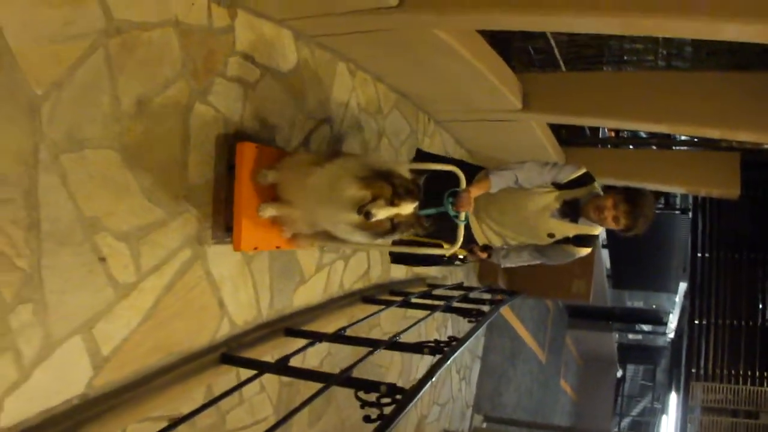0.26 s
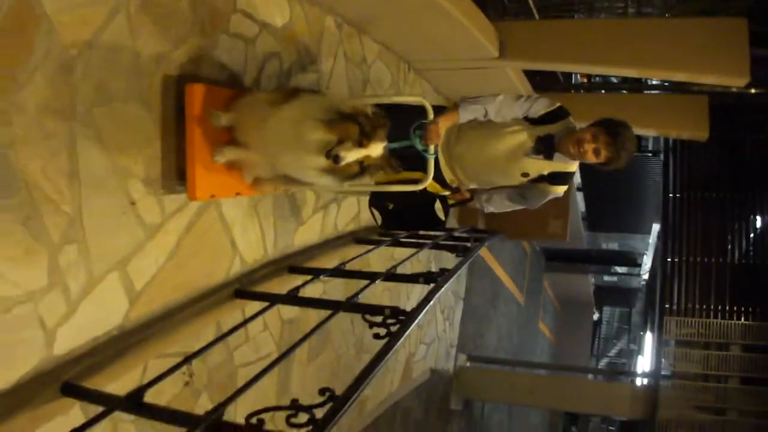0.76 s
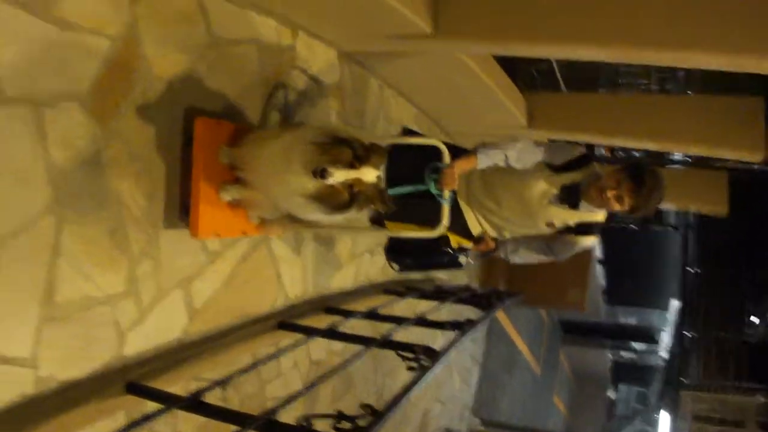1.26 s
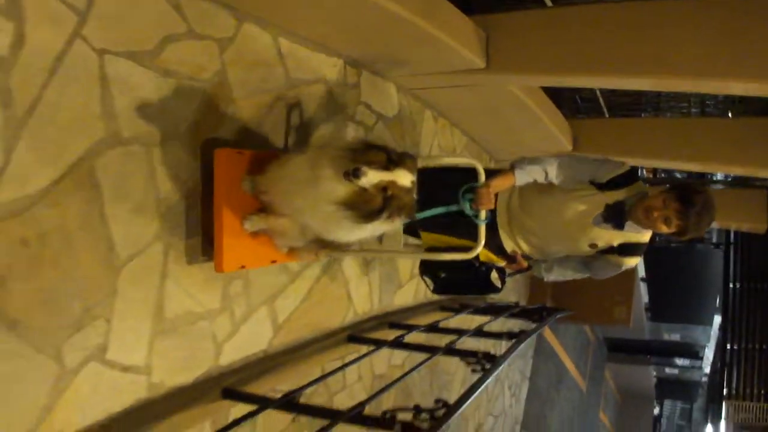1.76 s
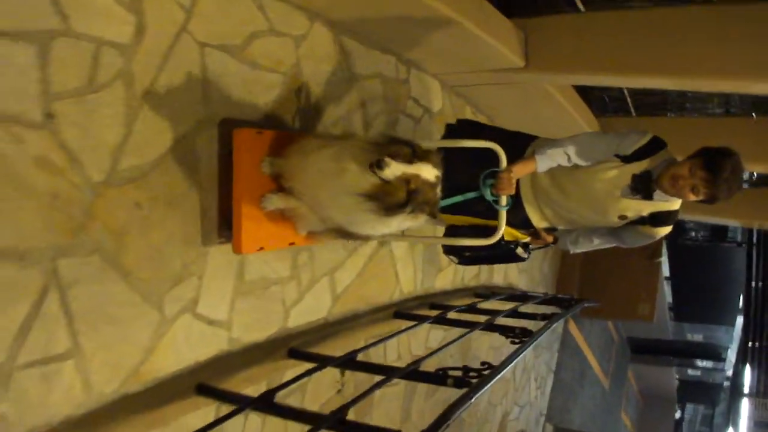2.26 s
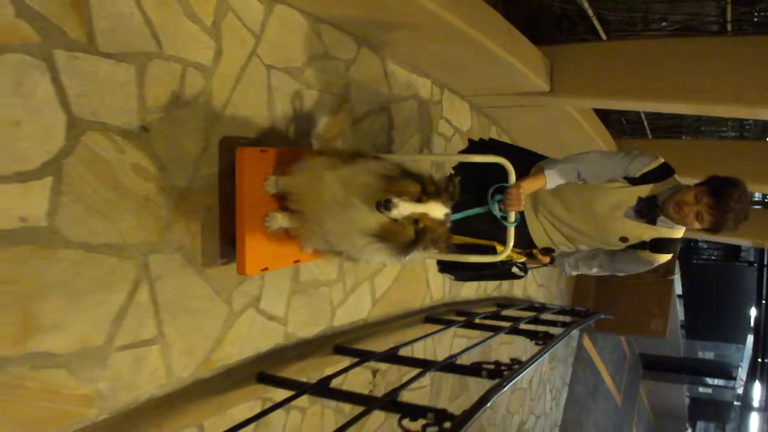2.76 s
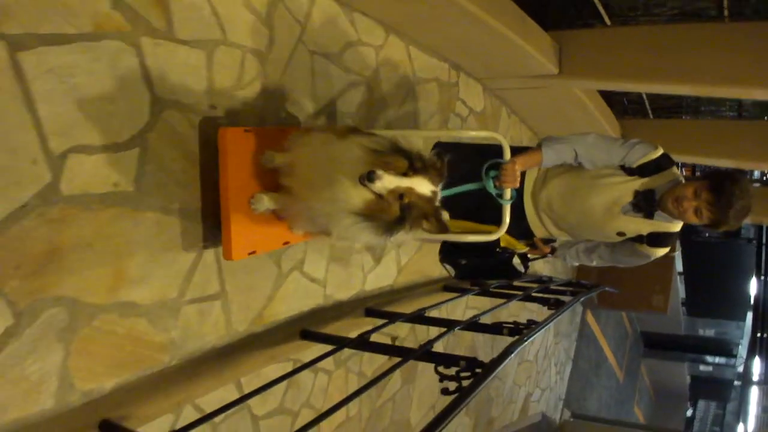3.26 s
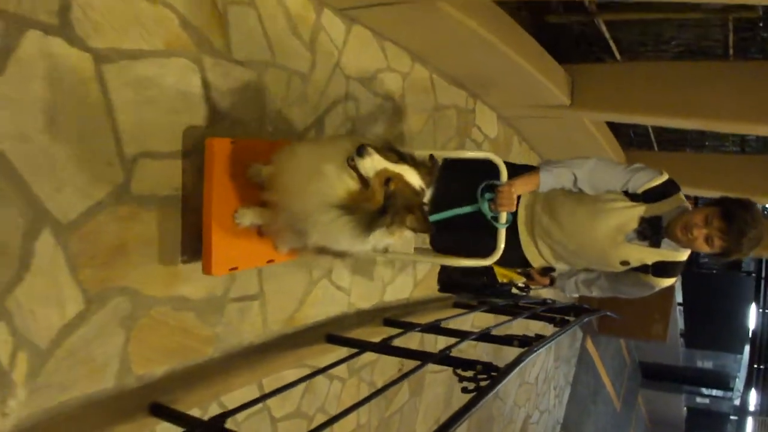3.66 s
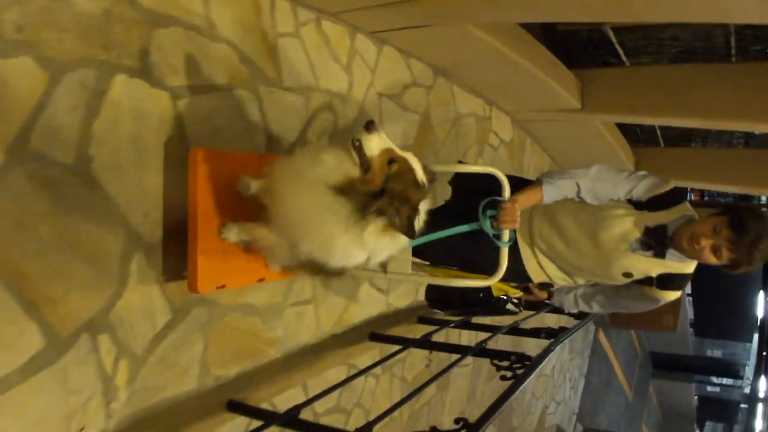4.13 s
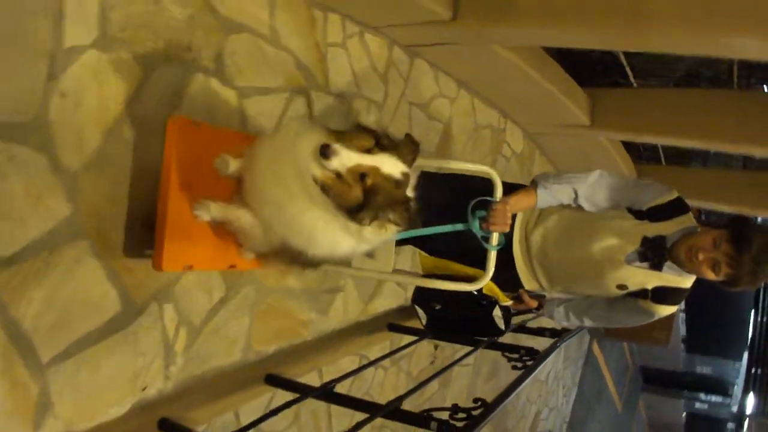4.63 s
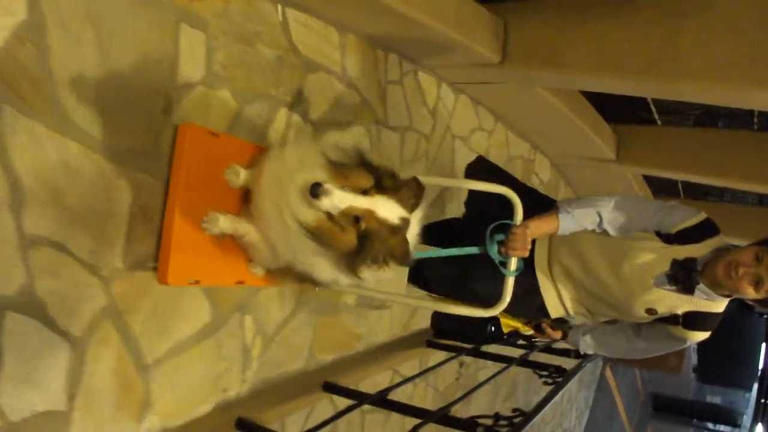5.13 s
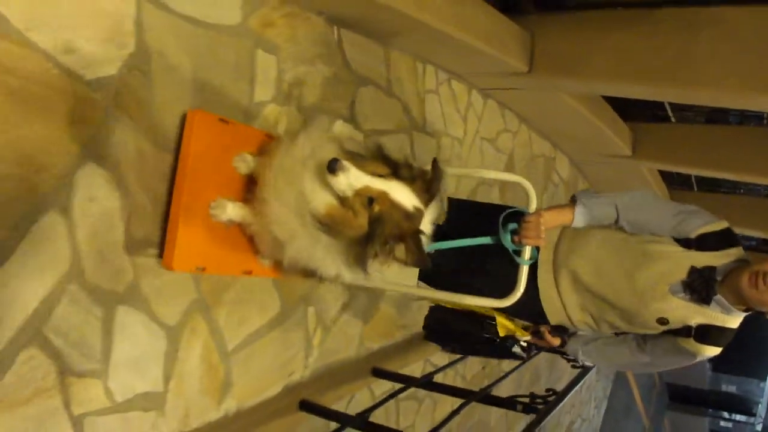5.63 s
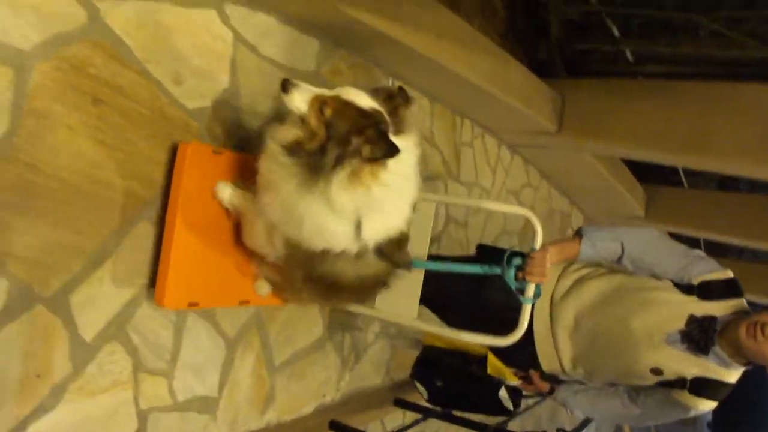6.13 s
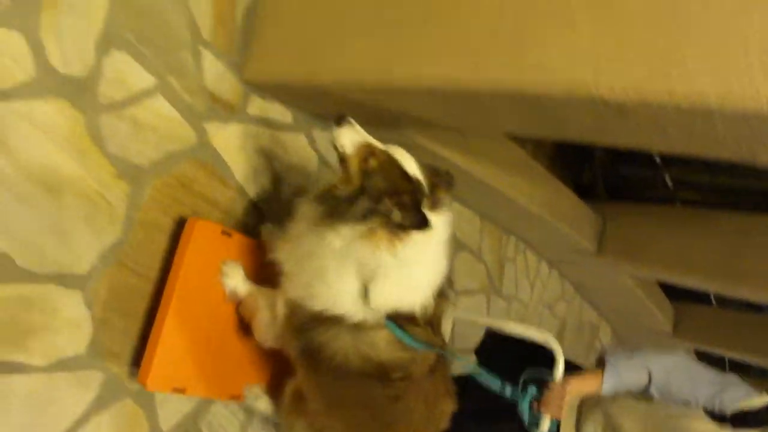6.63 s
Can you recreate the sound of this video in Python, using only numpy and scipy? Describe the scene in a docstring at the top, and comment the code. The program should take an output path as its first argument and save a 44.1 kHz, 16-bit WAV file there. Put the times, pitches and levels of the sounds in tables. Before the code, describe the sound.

A sharp knock opens, then a loaded hand cart rolls over flagstones in a hall. Its small hard wheels drop into the joints several times a second, each knock setting the plastic deck and castors into hollow clatter. Between knocks the wheels rumble, grit fizzes and loose metal ticks. The microphone stays close, brushed now and then by soft puffs of air.

```python
"""A sharp knock, then hollow clatter: a hand cart with a dog on its plastic deck rolls over flagstones.
Its small hard wheels drop into the joints, and each blow sets the deck and castors chattering in a hall.
Between the joints the wheels rumble on rough stone, grit fizzes under them and loose metal ticks.
Underneath, the loaded frame thuds softly, and now and then a puff of air brushes the microphones."""
import sys
import numpy as np
from scipy import signal
from scipy.fft import rfft, irfft
from scipy.io import wavfile
from scipy.ndimage import uniform_filter1d, minimum_filter1d

SR = 44100
rng = np.random.default_rng(int(sys.argv[2]) if len(sys.argv) > 2 else 0)


def dump_mix(stems):
    """Bounce the given channels to the path in sys.argv[1] as a 16-bit WAV at rate SR."""
    frames = np.atleast_2d(stems).T  # one column per channel
    limited = np.clip(frames, -1, 1)  # hard clip at full scale
    pcm = np.round(limited * 32767).astype(np.int16)
    wavfile.write(sys.argv[1], SR, pcm)


N = 303849
TIME = np.arange(N) / SR

# Table levels are relative: each layer sets its own gain.
# air buffeting the moving microphones: middle_s, length_s, level_db
AIR_PUFFS = [(1.87, 0.057, -33), (2.54, 0.23, -36), (2.72, 0.13, -40), (3.77, 0.066, -27.5),
             (4.99, 0.034, -26.5), (5.1, 0.073, -34), (5.3, 0.34, -43), (5.83, 0.1, -28.5),
             (5.93, 0.11, -29), (6.38, 0.084, -35.5), (6.62, 0.077, -36)]
# dull tone of a puff: frequency_hz, level_db
PUFF_SPECTRUM = [(20, -25), (50, -33.5), (90, -1.5), (140, 2), (200, 7.5), (300, -7.5), (600, -50),
                 (1200, -85)]
# low thud of the loaded frame: frequency_hz, level_db
THUD_SPECTRUM = [(15, -32), (35, -32), (60, -23), (100, -10), (150, 6.5), (195, 3.5), (260, -3.5),
                 (500, -59.5)]
# bed of fine grit under the wheels: time_s, level_db
GRIT_LEVELS = [(0.0, -55.5), (1.0, -53), (1.45, -55), (2.1, -55.5), (2.8, -57), (3.1, -53.5), (4.0, -54),
               (5.2, -54), (5.9, -51), (6.45, -56), (6.89, -48.5)]
# a wheel scrapes over sand: middle_s, length_s, level_db
SAND_SCRAPES = [(1.33, 0.24, -47), (1.59, 0.035, -41), (1.865, 0.026, -38), (1.92, 0.14, -46),
                (2.21, 0.045, -54), (2.48, 0.2, -45.5), (2.58, 0.065, -50), (3.05, 0.3, -48),
                (3.6, 0.1, -45), (3.76, 0.064, -45.5), (4.22, 0.05, -44.5), (4.35, .05, -43.5),
                (4.8, .09, -45.5), (4.93, 0.043, -45.5), (5.41, 0.11, -44), (5.56, 0.029, -40.5),
                (6.04, 0.037, -41), (6.14, .06, -42), (6.24, .05, -42), (6.34, 0.036, -48),
                (6.48, 0.23, -42)]
# fizz of crushed sand: frequency_hz, level_db
GRIT_SPECTRUM = [(2500, -49), (3300, -12), (5100, -14), (5800, 2.5), (8000, 2), (10000, -2.5),
                 (11100, -11.5), (11800, -40), (14000, -33), (16000, -56)]
# modes of the castors' small steel parts: pitch_hz, level_db, t60_s
STEEL_MODES = [(5910, 25, 0.054), (5850, -17, 0.024), (7780, 2.5, 0.067), (7540, -3.5, 0.033),
               (10300, -23, .03)]
# loose metal touches: start_s, level_db, pitch_hz
METAL_TICKS = [(0.0957, -25.5, 6250), (0.3611, -35, 6650), (0.5594, -33, 6700), (0.7107, -26, 7700),
               (1.266, -38, 5760), (1.305, -29, 6100), (1.476, -28.5, 7500), (1.5584, -30, 7040),
               (1.5876, -27, 7740), (1.853, -22, 6900), (2.205, -32, 5950), (2.4632, -24.5, 5900),
               (2.866, -31, 6000), (3.1207, -28, 7030), (3.321, -32, 5830), (3.866, -33, 5910),
               (5.3883, -18, 6600), (5.5439, -11.5, 7900), (5.913, -31.5, 8100), (6.029, -24, 5880),
               (6.137, -25, 8300), (6.2083, -30, 7100), (6.2287, -26, 7200), (6.3763, -27, 7000),
               (6.42, -27, 6500), (6.4862, -23.5, 6000), (6.6763, -34, 6490)]
# a castor plate rings briefly: start_s, level_db, pitch_hz
PLATE_CLINKS = [(0.5621, -27, 2270), (0.7115, -30, 2150), (1.2038, -26, 2250), (1.853, -27, 2240),
                (3.1237, -23, 2180), (3.6206, -25, 2200), (3.9828, -25.5, 2220), (5.3896, -21, 2190),
                (6.106, -28, 2360), (6.81, -22, 2040)]
# short, hollow tones within the clatter: start_s, pitch_hz, level_db
HOLLOW_TONES = [(0.108, 292, -13.5), (0.311, 263.6, -17), (0.38, 399, -14), (0.381, 630, -9.5),
                (0.715, 274, -22), (0.931, 406, -13.5), (1.281, 710, -12.5), (1.466, 261.6, -17),
                (1.577, 632.6, -8.5), (1.891, 560, -13), (1.929, 422, -18.5), (2.105, 367, -14.5),
                (2.204, 367.6, -12), (2.512, 569, -15), (2.586, 287, -25), (2.9, 372, -15.5),
                (3.023, 528, -15), (3.11, 596, -13), (3.29, 375, -14), (3.446, 637, -14),
                (3.464, 369, -12.5), (3.818, 363.5, -18), (4.204, 280, -22), (4.393, 372, -14.5),
                (4.974, 264, -23.5), (4.979, 778, -14.5), (5.362, 620, -11.5), (5.375, 265, -17.5),
                (5.785, 256, -20), (6.273, 721, -18), (6.413, 595, -13), (6.419, 324, -14),
                (6.49, 398, -21), (6.597, 327, -10.5), (6.674, 580, -10.5), (6.686, 332, -13.5)]
# modes of the plastic deck: pitch_hz, level_db, t60_s
DECK_MODES = [(246, -14, 0.22), (322, -14, 0.033), (363.7, -2, 0.15), (415, -4, 0.29), (595, -7, 0.15),
              (647, -24, 0.033), (820, -12.5, 0.03), (1181, 0.5, 0.081)]
# steady rolling, louder with speed and coarser stone: time_s, level_db
ROLL_LEVELS = [(0.0, -22), (0.75, -20), (1.08, -25), (1.5, -24.5), (1.8, -27.5), (2.1, -24), (2.43, -26),
               (2.62, -17.5), (2.82, -29), (3.0, -36), (3.9, -25), (4.3, -27.5), (4.6, -29), (5.5, -24.5),
               (5.97, -28), (6.2, -17.5), (6.6, -25.5), (6.89, -21.5)]
# the wheels growl over rough stone: middle_s, length_s, level_db
ROUGH_PATCHES = [(0.70, 0.1, -19), (1.0, 0.053, -23), (1.2, 0.14, -21), (1.72, 0.057, -17.5),
                 (1.92, 0.14, -18), (2.09, 0.039, -22), (2.3, .07, -37), (2.62, 0.17, -25),
                 (3.05, 0.24, -20), (3.475, 0.13, -16), (3.62, 0.11, -21), (4.0, 0.047, -14.5),
                 (4.58, 0.1, -23.5), (4.988, 0.0064, -13.5), (5.43, 0.12, -14.5), (5.84, 0.063, -20),
                 (6.5, 0.13, -21.5), (6.63, 0.13, -17.5)]
# body of the clatter: frequency_hz, level_db
CHATTER_SPECTRUM = [(100, -45), (190, -22), (255, -5.5), (400, -3), (660, 2), (900, -4), (1250, -6),
                    (1700, -9.5), (2400, -21), (2900, -44.5), (3500, -44), (4200, -73), (6000, -40),
                    (9000, -86)]
# response of low deck, body and bright castors, a row each: rolling_db, knock_db, build_s, t60_s
CHATTER_BANDS = [(2, 4, 0.0063, 0.38), (-.5, 5, 0.0012, 0.41), (-2, 4, 0.00067, 0.29)]
# a wheel strikes a joint: time_s, level_db, pitch_hz, crack_db, chatter_db
JOINT_KNOCKS = [(0.005, 11, 720, -33.5, -20), (0.0896, -1, 890, -72, -17), (0.0988, 2.5, 1090, -40, -31),
                (0.2669, 5.5, 994, -50, -21), (0.367, 4, 1000, -44, -16.5), (0.3768, 8, 1035, -26, -19.5),
                (0.4722, -0.5, 920, -50, -26), (0.565, 3.5, 1020, -39, -19.5),
                (0.6562, 14, 990, -22.5, -23.5), (0.7128, 9.5, 1105, -26.5, -31),
                (0.779, -3, 880, -62, -31), (0.802, -0.5, 1110, -55, -31), (0.8654, 2.5, 880, -51, -33),
                (0.9044, 4, 1010, -54, -19), (0.921, -3, 1100, -57, -32), (1.019, -3.5, 1100, -60, -34),
                (1.1353, 1.5, 1010, -37, -21), (1.2057, -7, 1170, -34, -30), (1.2676, 4.5, 803, -50, -20),
                (1.281, 5, 1240, -27, -17.5), (1.3128, 6, 1210, -26.5, -20.5),
                (1.48, 0.5, 1105, -42, -16.5), (1.562, 3.5, 1070, -34, -16.5),
                (1.5764, -4, 870, -25.5, -18), (1.61, 5, 700, -30, -21.5), (1.6298, 15.5, 1230, -21.5, -20),
                (1.8815, 3.5, 955, -43, -22), (1.9093, -3, 694, -40, -19), (2.0678, -4, 915, -62, -43),
                (2.1709, -2.5, 710, -58, -17), (2.2086, 2, 950, -51, -16), (2.2334, -0.5, 970, -51, -35),
                (2.2896, 5, 940, -31, -21.5), (2.3513, 4.5, 732, -49, -28), (2.463, -0.5, 1240, -39, -23),
                (2.508, 3, 840, -55, -20.5), (2.564, 14, 1237, -24.5, -17), (2.6927, -1, 706, -63, -25),
                (2.7363, 0.5, 950, -52, -32), (2.8604, 2, 710, -53, -22.5), (2.8647, 3, 866, -31.5, -20.5),
                (2.9249, 0, 663, -46, -40), (3.1262, 4.5, 1040, -32, -16), (3.1596, 0.5, 740, -37, -38),
                (3.197, 2, 980, -51, -20), (3.2263, 6.5, 680, -40, -23), (3.285, 0, 900, -55, -19),
                (3.4955, 1, 790, -53, -38), (3.6077, 0, 910, -46, -31), (3.6955, 2.5, 935, -36.5, -18),
                (3.7997, 0.5, 885, -54, -17.5), (3.8272, 5, 930, -52, -19), (3.8733, 2.5, 685, -42, -35),
                (3.984, 8, 1120, -46, -23), (4.0028, 4, 710, -37, -21.5), (4.048, 2.5, 840, -51, -19),
                (4.1847, -3, 890, -58, -22.5), (4.3382, 1, 1060, -38, -24), (4.3586, 4, 910, -29.5, -18),
                (4.4439, 2, 605, -61, -19.5), (4.5906, -2.5, 744, -52, -41), (4.7622, 3.5, 1070, -26, -17),
                (4.9961, 2.5, 940, -34.5, -19.5), (5.1327, 3.5, 654, -35, -19), (5.2889, 2, 532, -45, -35),
                (5.319, -0.5, 730, -49, -23), (5.378, -10, 780, -35, -15), (5.3913, 3, 1030, -23.5, -30),
                (5.6068, 3.5, 960, -58, -23), (5.6552, -3.5, 706, -62, -45), (5.7413, 1, 1080, -56, -21),
                (5.7785, -3.5, 604, -63, -46), (6.0227, -1.5, 605, -52, -23), (6.0963, 5, 674, -34, -13.5),
                (6.1417, 6, 1120, -29, -18.5), (6.2388, -6, 890, -37, -24), (6.2675, 0, 577, -43, -22),
                (6.3146, 6.5, 714, -29.5, -20.5), (6.4239, 7.5, 640, -26, -14.5),
                (6.461, -11, 1200, -47, -24), (6.6812, 7, 765, -26.5, -18), (6.7998, -1.5, 880, -46, -19.5)]
# thin, bright crack of overload on the loudest knocks: frequency_hz, level_db
CRACK_SPECTRUM = [(900, -31), (1600, -12), (2400, 18), (2900, 5), (3600, 4), (5000, -2.5), (6500, -1.5),
                  (9000, -6.5), (14000, -23)]
# tone of the stereo side signal: frequency_hz, level_db
SIDE_SPECTRUM = [(30, -8), (65, -5), (125, -8), (180, 2), (250, -13), (500, -13), (1000, -11), (2000, -3.5),
                 (4000, 1.5), (8000, -4)]
# left channel against the right: frequency_hz, level_db
LEFT_BALANCE = [(100, -1), (250, -1.9), (500, -1.5), (1000, -1.5), (8000, -0.5)]


def amp(db):
    """Decibels to gain."""
    return 10 ** (np.asarray(db) / 20)


def unit_rms(x):
    """Scales to rms 1."""
    return x / np.sqrt(np.mean(x ** 2) + 1e-20)


def level_curve(rows):
    """A level table as a fader move in dB, sample by sample."""
    return np.interp(TIME, *np.transpose(rows))


def add(mix, start_s, sound):
    """Mixes a sound in at its start time."""
    part = mix[max(round(start_s * SR), 0):][:len(sound)]
    part += sound[:len(part)]


def colour(x, spectrum, size=4096):
    """Minimum-phase EQ with the given spectrum."""
    hz, db = np.transpose(spectrum)
    bins_hz = abs(np.fft.fftfreq(size, 1 / SR))
    log_gain = np.log(amp(np.interp(np.log(bins_hz + 1), np.log(hz + 1), db)))
    taps = np.fft.ifft(np.exp(signal.hilbert(log_gain).conj())).real[:size // 2]
    return signal.oaconvolve(x, taps)[:N]


def lowpass(x, hz, order=4):
    """Low-pass without delay."""
    return signal.sosfiltfilt(signal.butter(order, hz, fs=SR, output="sos"), x)


def clicks(per_s, spread_db):
    """Random tiny impacts, most of them weak."""
    strength = amp(spread_db * np.minimum(rng.exponential(1, N), 4))
    return unit_rms(strength * rng.choice([-1, 1], N) * (rng.random(N) < per_s / SR))


def pulse(t, rise_s):
    """An envelope that rises to 1 and dies away."""
    return t / rise_s * np.exp(1 - t / rise_s)


def swells(rows):
    """Power of a row of smooth, bell-shaped swells."""
    return sum(amp(db) ** 2 * np.exp(-(2 * (TIME - s) / length_s) ** 2) for s, length_s, db in rows)


def wander(depth_db, per_s):
    """A gain that drifts at random."""
    knots_s = np.arange(0, TIME[-1] + 1, 1 / per_s)
    return amp(depth_db * np.interp(TIME, knots_s, rng.standard_normal(2000)[:len(knots_s)]))


def shaking(build_s, t60_s, rebound_s=0.0012):
    """Power of the shaking after each knock: it builds as the wheel lands again, then dies away."""
    power, t = np.zeros(N), TIME[:SR]
    envelope = (1 - np.exp(-t / build_s)) * amp(-60 * t / t60_s)
    for s, *_, chatter_db in JOINT_KNOCKS:
        add(power, s + rebound_s, (amp(chatter_db) * envelope) ** 2)
    return power


def echoes(x, t60_s, gap_s, patterns=3):
    """Dense, dying reflections after a gap; their patterns crossfade to suggest the cart's movement."""
    out, t = np.zeros(N), TIME[:SR // 2]
    for k in range(patterns):
        taps = rng.standard_normal(len(t)) * (rng.random(len(t)) < .2)
        taps *= (t > gap_s) * amp(-60 * t / t60_s)
        crossfade = np.sqrt(2 / patterns) * np.cos(np.pi * (1.3 * TIME + k / patterns))
        out += signal.oaconvolve(x * crossfade, taps / np.linalg.norm(taps))[:N]
    return out


def stereo(x, width_db):
    """Two close microphones: scattered sound adds width, mainly in the treble."""
    side = amp(width_db) * colour(echoes(x, t60_s=0.044, gap_s=0.00067), SIDE_SPECTRUM)
    return np.array([x + side, x - side])


def diffuse(source, shared):
    """A scattered source reaches each microphone partly alike and partly on its own."""
    common = source()
    return np.array([np.sqrt(shared) * common + np.sqrt(1 - shared) * source() for _ in "LR"])


def air_puffs(gain_db=-3):
    """Air buffets one microphone in low, soft puffs."""
    air = unit_rms(colour(rng.standard_normal(N), PUFF_SPECTRUM))
    return amp(gain_db) * np.sqrt(swells(AIR_PUFFS)) * air


def frame_thuds(steady_db=-49, jolt_db=-37):
    """The loaded frame thuds softly on the uneven floor, more after each knock."""
    power = amp(steady_db) ** 2 + amp(jolt_db) ** 2 * shaking(build_s=0.0065, t60_s=0.1)
    return np.sqrt(power) * unit_rms(colour(clicks(per_s=300, spread_db=0.5), THUD_SPECTRUM))


def grinding(jolt_db=-32):
    """How hard the wheels work the sand: lightly all the time, more in scrapes and after knocks."""
    jolts = amp(jolt_db) ** 2 * shaking(build_s=0.00067, t60_s=0.33)
    return np.sqrt(amp(level_curve(GRIT_LEVELS)) ** 2 + swells(SAND_SCRAPES) + jolts)


def grit(gain_db=1.7, wash_db=0.5):
    """Sand is crushed under the wheels in a fine crackle, blurred by the walls into a wash."""
    grains = clicks(per_s=700, spread_db=5) + amp(wash_db) * rng.standard_normal(N)
    return amp(gain_db) * unit_rms(colour(grains, GRIT_SPECTRUM)) * wander(depth_db=1, per_s=15)


def steel_jingle(per_s=14, gain_db=-17):
    """Small steel parts ring when jolted: mostly faint, with a rare clear ping."""
    out, t = np.zeros(N), TIME[:SR // 10]
    for hz, db, t60_s in STEEL_MODES:
        ring = amp(db - 60 * t / t60_s) * np.sin(2 * np.pi * hz * t)
        out += signal.oaconvolve(clicks(per_s, spread_db=8.5), ring)[:N]
    return amp(gain_db) * unit_rms(out)


def metal_ticks(gain_db=-6, rise_s=0.0019, tail_db=-22, tail_t60_s=0.25, width_hz=2900):
    """Loose metal touches in a short bright burst, then settles in tiny bounces."""
    out, t = np.zeros(N), TIME[:6000]
    bins_hz = np.fft.rfftfreq(len(t), 1 / SR)
    for s, db, hz in METAL_TICKS:
        bounces = rng.exponential(1, len(t) // 100).repeat(100)
        force = pulse(t, rise_s) + amp(tail_db - 60 * t / tail_t60_s) * bounces
        band = unit_rms(np.exp(-((bins_hz - hz) / width_hz) ** 2))
        add(out, s, amp(db + gain_db) * irfft(rfft(force * rng.standard_normal(len(t))) * band))
    return out - lowpass(out, hz=5300, order=12)  # keep only the sparkle


def plate_clinks(gain_db=-3, rise_s=0.007, width_hz=330):
    """A castor plate buzzes against its bolt in one broad resonance, soon damped by the load."""
    out, t = np.zeros(N), TIME[:2048]
    bins_hz = np.fft.rfftfreq(len(t), 1 / SR)
    for s, db, hz in PLATE_CLINKS:
        band = np.exp(-((bins_hz - hz) / width_hz) ** 2)
        buzz = unit_rms(irfft(rfft(rng.standard_normal(len(t))) * band))
        add(out, s, amp(db + gain_db) * pulse(t, rise_s) * buzz)
    return out


def hollow_tones(gain_db=-3, rise_s=0.018, waver=0.022):
    """Short, hollow, wavering tones swell within the clatter and die away."""
    out, t = np.zeros(N), TIME[:SR // 4]
    for s, hz, db in HOLLOW_TONES:
        drift = unit_rms(uniform_filter1d(rng.standard_normal(len(t)), size=500))
        cycles = hz * np.cumsum(1 + waver * drift) / SR + rng.random()
        add(out, s, amp(db + gain_db) * pulse(t, rise_s) * np.sin(2 * np.pi * cycles))
    return out


def deck_resonance(x, ring_db):
    """The plastic deck rings along with whatever shakes it."""
    t = TIME[:SR // 3]
    ring = sum(amp(db - 60 * t / t60_s) * np.cos(2 * np.pi * hz * t) / t60_s
               for hz, db, t60_s in DECK_MODES)
    return x + amp(ring_db) * 2 * np.log(1000) / SR * signal.oaconvolve(x, ring)[:N]


def wheel_hops(flight_s=0.0016, duck_db=-6):
    """A gain that ducks at each knock, as the wheel jumps and loses contact for an instant."""
    lifted = sum(np.exp(-((TIME - s - flight_s / 2) / flight_s) ** 2) for s, *_ in JOINT_KNOCKS)
    return amp(duck_db * np.minimum(lifted, 1))


def chatter(low_hz=450, bright_hz=1100):
    """Castors and deck clatter in countless small impacts, driven by rolling and by each knock."""
    rolling = amp(level_curve(ROLL_LEVELS)) ** 2 + swells(ROUGH_PATCHES)
    impacts = clicks(per_s=420, spread_db=2)
    impacts = impacts + amp(-1.5) * echoes(impacts, t60_s=0.51, gap_s=0.003)
    clatter = unit_rms(deck_resonance(colour(impacts, CHATTER_SPECTRUM), ring_db=1.5))
    # the impacts share out the energy at hand, which evens the level
    clatter /= np.sqrt(uniform_filter1d(clatter ** 2, size=1900) + 1e-6)
    lows, lows_and_mids = lowpass(clatter, low_hz), lowpass(clatter, bright_hz)
    bands = [lows, lows_and_mids - lows, clatter - lows_and_mids]
    out = np.zeros(N)
    # the heavy deck answers late and long, the light castors at once and briefly
    for band, (rolling_db, knock_db, build_s, t60_s) in zip(bands, CHATTER_BANDS):
        power = amp(rolling_db) ** 2 * rolling + amp(knock_db) ** 2 * shaking(build_s, t60_s)
        out += band * np.sqrt(power) * wander(depth_db=0.3, per_s=20)
    return out * wheel_hops()


def damped_swing(hz, rise_cycles, phase):
    """A struck part swings a few times; returns the rise time and the sound."""
    t, rise_s = TIME[:1600], rise_cycles / hz
    return rise_s, pulse(t, rise_s) ** 2 * np.sin(2 * np.pi * (hz * t + phase))


def wheel_knocks(rise_cycles=1.128, ring_db=-20, fork_hz=1750, fork_lead_s=0.00041,
                 blow_gain_db=-7, crack_gain_db=-1):
    """Each joint swings wheel and stiffer fork; the loudest knocks carry a thin crack of overload."""
    blows, cracks = np.zeros(N), np.zeros(N)
    for s, db, hz, crack_db, _ in JOINT_KNOCKS:
        wheel_phase, fork_phase, detune = rng.random(3)
        wheel_rise_s, wheel = damped_swing(hz, rise_cycles, wheel_phase)
        add(blows, s - wheel_rise_s, amp(db) * wheel)
        _, ring = damped_swing(hz, rise_cycles=4, phase=wheel_phase + rise_cycles)
        add(blows, s, amp(db + ring_db) * ring)
        clack_hz = fork_hz * (.85 + .3 * detune)
        fork_rise_s, clack = damped_swing(clack_hz, rise_cycles=1.737, phase=fork_phase)
        # the fork clacks louder under strong blows and short, high-pitched ones
        clack_db = -14.5 + 1.06 * db + 17 * np.log2(hz / 900)
        add(blows, s - fork_rise_s - fork_lead_s, amp(clack_db) * clack)
        add(cracks, s - fork_rise_s / 2, amp([crack_db]))
    blows = lowpass(blows, hz=2600, order=6)
    blows = blows - lowpass(blows, hz=470)
    # each crack has a brief crackling tail
    cracks = cracks + amp(-6.5) * echoes(cracks, t60_s=0.075, gap_s=0.00076, patterns=8)
    makeup = SR / 4000  # the crack keeps only about 2 kHz of an impulse's full band
    return amp(blow_gain_db) * blows + amp(crack_gain_db) * makeup * colour(cracks, CRACK_SPECTRUM)


def scene():
    """The cart up close, with the stone hall answering."""
    knocks = wheel_knocks()
    rattle = chatter() + hollow_tones() + plate_clinks()
    hall = amp(-17.5) * echoes(knocks + rattle, t60_s=0.87, gap_s=0.0033)
    cart = stereo(knocks, width_db=-9) + stereo(rattle + hall, width_db=-5.5)
    fizz = grinding() * (stereo(steel_jingle(), width_db=-14) + diffuse(grit, shared=0.062))
    thuds = frame_thuds()
    ticks = diffuse(metal_ticks, shared=0.075)
    air = np.array([air_puffs(), air_puffs()])
    return cart + fizz + thuds + ticks + air


def record(dry):
    """The mix leans slightly right; a fast limiter holds the hardest knocks; the very top is cut."""
    left_eq = np.array(LEFT_BALANCE) * [1, .5]
    right_eq = left_eq * [1, -1]
    mix = np.array([colour(dry[0], left_eq), colour(dry[1], right_eq)])
    limiter_gain = minimum_filter1d(1 / np.maximum(abs(mix).max(0), 1), size=45)
    mix *= uniform_filter1d(uniform_filter1d(limiter_gain, size=23), size=23)
    high_cut = signal.firwin(255, cutoff=14500, window=("kaiser", 9), fs=SR)
    return signal.oaconvolve(mix, high_cut[None], "same")


dry = scene()
out = record(dry)
dump_mix(out)
```